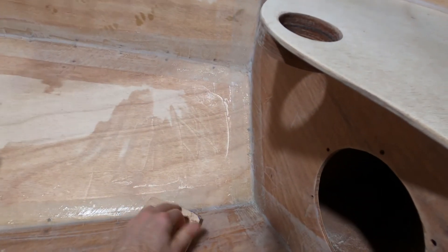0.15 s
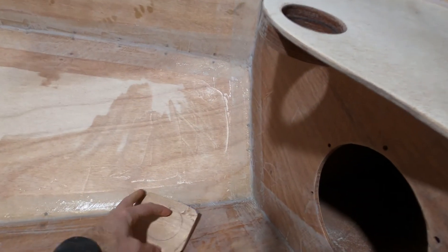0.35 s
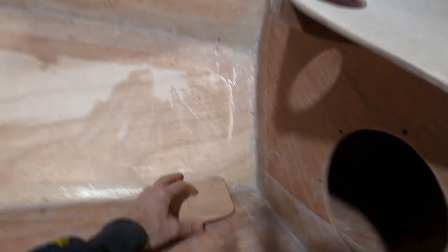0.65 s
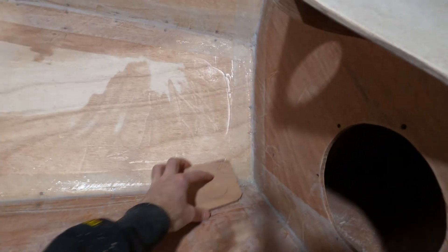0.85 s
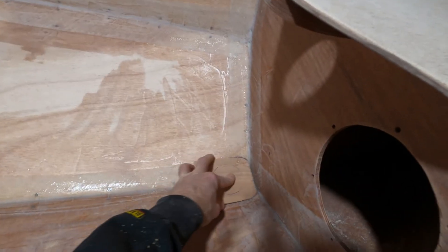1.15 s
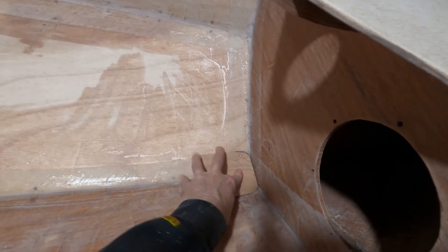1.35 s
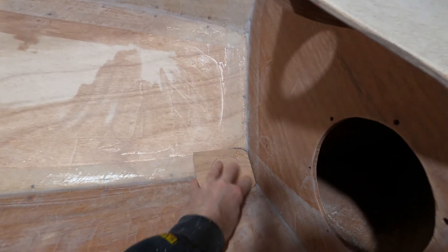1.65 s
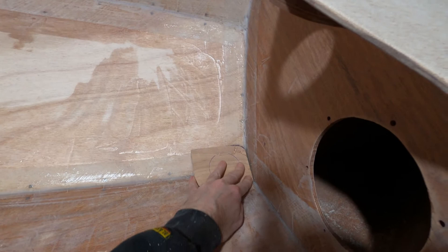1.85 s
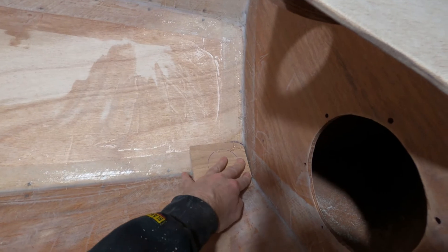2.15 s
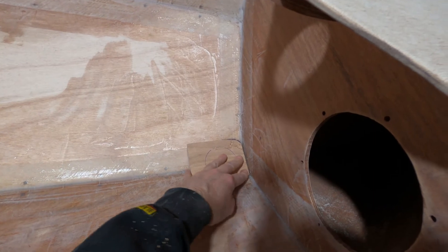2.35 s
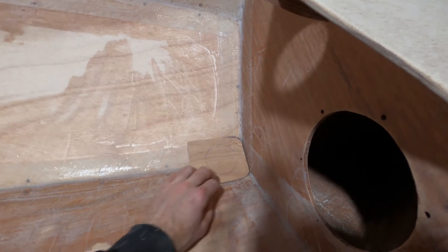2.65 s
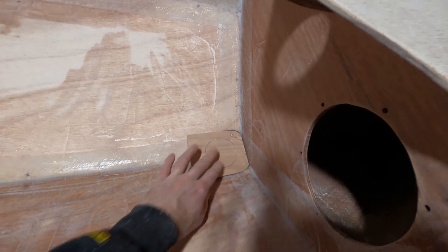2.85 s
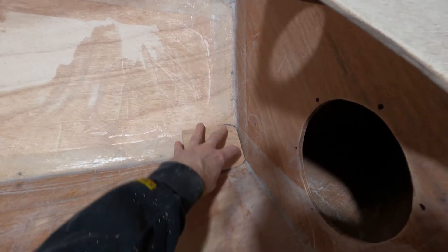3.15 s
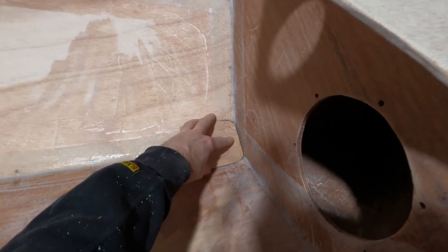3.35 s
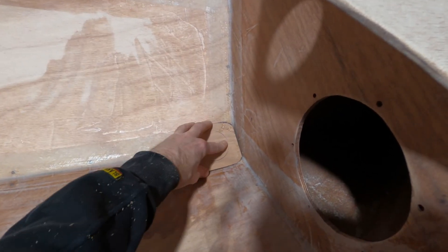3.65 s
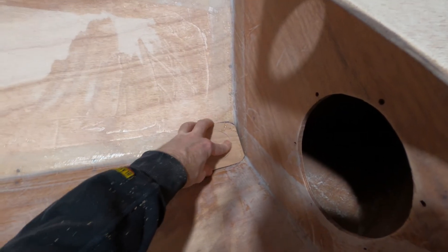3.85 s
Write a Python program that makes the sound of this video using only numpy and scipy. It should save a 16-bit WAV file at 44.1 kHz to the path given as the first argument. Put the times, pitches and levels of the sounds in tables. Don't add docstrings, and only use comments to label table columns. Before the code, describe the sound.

Plywood plate slaps down on a hollow wooden hull, then drags, knocks and rubs into a corner

```python
import sys
import numpy as np
from scipy import signal
from scipy.fft import rfft, irfft
from scipy.io import wavfile
from scipy.ndimage import uniform_filter1d, map_coordinates

SR = 44100
rng = np.random.default_rng(int(sys.argv[2]) if len(sys.argv) > 2 else 0)


def inscribe(sig):
    pcm = np.round(np.clip(np.atleast_2d(sig).T, -1, 1) * 32767)
    wavfile.write(sys.argv[1], SR, pcm.astype(np.int16))


def convert_level_to_amplitude(level_db):
    exponent = np.asarray(level_db, float) / 20
    return 10 ** exponent


N = 176400

# f/Hz, level/dB
BODY_COLOUR = [(120, -7), (220, 2.5), (400, 1), (650, -1.5), (1100, -8), (2500, -20)]
# f/Hz, width/Hz, level/dB
PANEL_MODES = [(285, 28, -2), (398.7, 25, 1.5), (519, 50, -2), (615.4, 14, 6)]


def unit(x):
    return x / np.sqrt(np.mean(x ** 2) + 1e-20)


def along(points, hz):
    f, v = np.transpose(points)
    return np.interp(np.log(hz + 0.15), np.log(f), v)


def wobble(rate):
    knots = rng.standard_normal(int(N * rate / SR) + 4)
    return map_coordinates(knots, [np.arange(N) * rate / SR])


def noise(spectrum, peaks=(), grit_db=0, patchy_db=0):
    grit = wobble(700) + wobble(60) + wobble(14)
    x = rng.standard_normal(N) * convert_level_to_amplitude(grit_db * grit)
    z = signal.stft(x, nperseg=512)[2]
    patches = uniform_filter1d(rng.standard_normal(z.shape), 5, 0)
    patches = unit(uniform_filter1d(patches, 9, 1))
    x = signal.istft(z * convert_level_to_amplitude(patchy_db * patches), nperseg=512)[1]
    f = np.fft.rfftfreq(len(x), 1 / SR)
    closed = [(spectrum[0][0] / 3, -120)] + list(spectrum) + [(spectrum[-1][0] * 3, -120)]
    resonance = 1 + sum(convert_level_to_amplitude(db) / (1 + (2 * (f - centre) / width) ** 2) for centre, width, db in peaks)
    gain = convert_level_to_amplitude(along(closed, f)) * resonance
    return unit(irfft(rfft(x) * gain, len(x))[:N])


def hump(s, length):
    t = np.arange(N) / SR - s
    rise_share = 0.92
    side = np.where(t < 0, rise_share, 2 - rise_share)
    return np.exp(-0.5 * (t / (length / 3 * side)) ** 2)


def swells(rows, waver, flutter_db):
    out = np.zeros(N)
    for s, db, hz, length in rows:
        strength = convert_level_to_amplitude(db - 2.5 + flutter_db * wobble(45)) * hump(s, length)
        cycles = hz * np.cumsum(1 + waver * wobble(40)) / SR
        out += strength * np.sin(2 * np.pi * cycles)
    return out


def knocks():
    # t/s, level/dB, contact softness f/Hz, decay stretch (0-2), bass cut f/Hz
    blow_rows = [
        (0.001, -26.5, 246, 0.96, 142.3),
        (0.0825, -15.5, 324, 0.087, 365),
        (0.1159, -11, 2380, 0.85, 166),
        (1.024, -16, 1764, 0.52, 276),
        (1.206, -19.5, 710, 0.5, 230),
        (2.701, -46, 4220, 0.4, 243),
    ]
    # f/Hz, level/dB per Hz
    wood_colour = [(71, -51), (120, -1.5), (629, -6.5), (835, -8), (1500, -13), (2640, -19.5), (3300, -17),
                   (4840, -17.5), (15000, -54)]
    # f/Hz, t60/s
    decay_times = [(100, 0.73), (300, 0.45), (1000, 0.5), (4000, 0.2), (7000, 0.24), (14000, .05)]
    out, t = np.zeros(N + SR), np.arange(SR // 2) / SR
    for s, db, soft_hz, stretch, cut_hz in blow_rows:
        rattle_s = 0.027 * convert_level_to_amplitude(db / 2)
        hz, ts, z = signal.stft(rng.standard_normal(len(t)), SR, nperseg=256)
        t60 = stretch * along(decay_times, hz)[:, None]
        fall = convert_level_to_amplitude(-60 * np.maximum(ts - rattle_s, 0) / t60)
        contact = 1 / (1 + (hz / soft_hz) ** 2) / (1 + (cut_hz / (hz + 1)) ** 4)
        colour = convert_level_to_amplitude(along(wood_colour, hz)) * contact
        wash = signal.istft(z * fall * colour[:, None], SR, nperseg=256)[1][:len(t)]
        wash = wash / np.sqrt(np.mean(colour ** 2))
        crack_band = signal.butter(2, [cut_hz, 1.46 * soft_hz], 'band', fs=SR)
        crack = unit(signal.lfilter(*crack_band, rng.standard_normal(len(t))))
        crack = convert_level_to_amplitude(3 - 60 * t / 0.0022) * crack
        bass_cut = signal.butter(2, 0.64 * cut_hz, 'high', fs=SR)
        blow = signal.lfilter(*bass_cut, wash * (1 - np.exp(-t / 0.00024)) + crack)
        out[round(s * SR):][:len(t)] += convert_level_to_amplitude(db) * blow
    return out[:N]


def struck():
    # t/s, level/dB, f/Hz, t60/s
    mode_rows = [(0.13, -2, 600, 0.067), (0.118, -5.5, 1090, 0.04), (.128, -15.5, 398, 0.3),
                 (0.18, -11.5, 270, 0.024), (.119, -12.5, 1400, .08), (.152, -9, 325, 0.099),
                 (1.027, -10, 685, 0.13), (1.024, -16, 1076, 0.16), (1.025, -23, 2306, 0.034),
                 (1.1, -24, 470, 0.16), (1.025, -20, 834, .3), (1.045, -21, 345, .3),
                 (1.2065, -11, 590, 0.11), (1.22, -26, 480, 0.29), (1.207, -27, 400, 0.3),
                 (1.207, -14.5, 990, 0.069)]
    out = np.zeros(N)
    for s, db, hz, t60 in mode_rows:
        t = np.arange(N) / SR - s
        decay = convert_level_to_amplitude(db - 60 * np.abs(t) / t60 + 1.6 * wobble(60)) * (t > 0)
        out += decay * np.sin(2 * np.pi * hz * t)
    return out


def slap():
    start_s, length_s, sag_s = 0.1165, 0.043, 0.018
    from_hz, to_hz = 1000, 291.8
    t = np.maximum(np.arange(N) / SR - start_s, 0)
    hz = to_hz + (from_hz - to_hz) * np.exp(-t / sag_s) + 60 * wobble(120.4)
    shape = np.clip(t / 0.002, 0, 1) * np.clip((length_s - t) / 0.003, 0, 1)
    return convert_level_to_amplitude(-11.5 + 3.65 * wobble(160)) * shape * np.sin(2 * np.pi * np.cumsum(hz) / SR)


def drag():
    # t/s, speed as hiss level/dB, load as body level/dB
    drag_path = [(0.329, -62.5, -29.5), (.37, -43.5, -34), (.55, -43.5, -37.5), (0.609, -35.5, -31.5),
                 (.72, -36.5, -33), (0.764, -43, -34.5), (.8, -42.5, -34), (1, -40.5, -38),
                 (1.07, -33.5, -61), (1.14, -44.5, -39.5), (1.2, -40, -47), (1.29, -63, -46)]
    # f/Hz, level/dB
    hiss_colour = [(500, 5), (1500, 0.5), (3000, -6.5), (4100, -5.5), (5600, -7), (6500, -13.5),
                   (10000, -16.5), (15500, -29.5)]
    s, hiss_db, body_db = np.transpose(drag_path)
    t = np.arange(N) / SR
    speed = convert_level_to_amplitude(np.interp(t, s, hiss_db, left=-120, right=-120))
    load = convert_level_to_amplitude(np.interp(t, s, body_db, left=-120, right=-120))
    hiss = speed * noise(hiss_colour, grit_db=1.03, patchy_db=2.0)
    return hiss + load * noise(BODY_COLOUR, PANEL_MODES, grit_db=0.5, patchy_db=3.2)


def rubs():
    # t/s, length/s, scrape, body and fizz level/dB
    rub_rows = [
        (.07, 0.062, -49, -57.5, -58.5),
                (1.349, 0.053, -45.5, -40, -51), (1.473, 0.12, -57.5, -55.5, -65.5),
                    (1.553, 0.047, -54.5, -51, -57), (1.624, 0.2, -57.5, -53, -62.5),
                    (1.698, 0.067, -44.5, -53, -50.5), (1.767, 0.16, -51, -58, -61.5),
                    (1.875, 0.09, -47.5, -43, -63), (2.046, 0.075, -60.5, -61, -73),
                    (2.124, 0.028, -68, -65, -79), (2.245, 0.097, -66.5, -65, -74),
                    (2.418, 0.054, -57, -60.5, -65.5),
                (2.727, 0.056, -57.5, -49, -63.5), (2.859, 0.1343, -53, -53.5, -70),
                   (3.011, 0.21, -53, -45, -62.5), (3.085, 0.37, -71, -58, -82),
                   (3.217, 0.071, -55, -48.5, -55), (3.3, 0.11, -49.5, -55, -54.5),
                   (3.412, 0.043, -55.5, -48, -59.5), (3.487, 0.12, -48.5, -50, -60),
                   (3.529, 0.15, -53.5, -47, -63), (3.68, 0.094, -49, -45, -64),
                   (3.745, 0.16, -57.5, -56.5, -69.5), (3.885, 0.087, -53, -55, -64.5),
                   (3.93, 0.054, -40, -43, -56), (3.969, 0.057, -42, -33.5, -55)]
    # f/Hz, width/Hz, level/dB
    gap_modes = [(1177, 610, 8), (3300, 260, -1), (5624, 220, -10)]
    # f/Hz, level/dB
    scrape_colour = [(400, -15), (900, -4), (2000, -5.5), (5500, -4), (6800, -11), (12000, -45.5)]
    fizz_colour = [(6500, -15), (7800, 0), (9200, 1.5), (11000, -4.5), (13000, -7.5), (15500, -13)]
    rows = np.array(rub_rows)
    shape = np.array([hump(s, 0.84 * length) + convert_level_to_amplitude(-14) * hump(s, 3 * length) for s, length in rows[:, :2]])
    scrape, body, fizz = np.sqrt(convert_level_to_amplitude(2 * rows[:, 2:].T) @ shape ** 2)
    return (convert_level_to_amplitude(0.5) * scrape * noise(scrape_colour, gap_modes, grit_db=1.8, patchy_db=1.5)
            + body * noise(BODY_COLOUR, PANEL_MODES, grit_db=1.4, patchy_db=2.5)
            + fizz * noise(fizz_colour, grit_db=1.5, patchy_db=-1.0))


def skates():
    # t/s, level/dB, f/Hz, length/s, width/Hz
    skate_rows = [(.425, -52, 4050, .05, 400), (.6, -46, 4200, .14, 400), (0.844, -49, 3310, 0.1, 180),
                  (.95, -52, 3300, .1, 300), (1.348, -52, 4700, .05, 500), (1.546, -56, 1201, 0.71, 398.6),
                  (1.47, -60, 3450, .12, 250), (1.55, -56, 3200, .04, 500), (1.66, -57, 3350, .2, 300),
                  (1.66, -59, 5600, .2, 350), (1.78, -58, 3300, .12, 600), (2.055, -62, 3400, .09, 300),
                  (2.278, -65, 1160, 0.3, 399.7), (2.27, -66, 3400, 0.2, 300), (2.42, -60, 3350, .05, 350),
                  (2.74, -57, 1600, .08, 250), (2.88, -58, 3100, .14, 900), (2.87, -52, 900, .12, 700),
                  (3.154, -54, 1150, 0.78, 450.4), (3.1, -60, 3400, .15, 300), (3.22, -55, 3450, 0.08, 349),
                  (3.31, -54, 3500, .1, 400), (3.3, -56, 5500, .07, 600), (3.44, -59, 4500, .1, 350),
                  (3.76, -58, 1500, .1, 500), (3.927, -46, 1140, .045, 120)]
    t = np.arange(N) / SR
    out = np.zeros(N)
    for s, db, hz, length, width_hz in skate_rows:
        strength = convert_level_to_amplitude(db + 3 * wobble(30)) * hump(s, length)
        band = wobble(width_hz) * np.sin(2 * np.pi * hz * t)
        band += wobble(width_hz) * np.cos(2 * np.pi * hz * t)
        out += strength * band
    return out


def ticks():
    # t/s, peak level/dB, centre f/Hz
    click_rows = [(.1162, -5, 1300), (.171, -25, 2400), (.202, -21, 2900), (.414, -33.5, 1900),
                  (.46, -40, 3100), (.566, -36, 1650), (.677, -36.5, 1790), (.769, -32.5, 1500),
                  (1.0251, -22, 3000), (1.031, -26, 2300), (1.159, -38, 3400), (1.339, -41.5, 1307),
                  (2.381, -46, 900), (2.702, -45.5, 2500), (2.829, -44.5, 1500), (2.915, -42, 1500),
                  (3.005, -38.5, 1700), (3.287, -48.5, 1180), (3.488, -44, 2200), (3.553, -41, 1880),
                  (3.893, -47, 1120)]
    out, t = np.zeros(N + SR), np.arange(SR // 20) / SR
    for s, db, hz in click_rows:
        band = signal.butter(2, [hz / 1.5, hz * 1.5], 'band', fs=SR)
        decay = convert_level_to_amplitude(-60 * t * hz / 20)
        click = signal.lfilter(*band, decay * rng.standard_normal(len(t)))
        out[round(s * SR):][:len(t)] += convert_level_to_amplitude(db + 2.5) * click / np.abs(click).max()
    return out[:N]


def bumps():
    # t/s, level/dB, f/Hz, length/s
    bump_rows = [(.083, -34.5, 3300, 0.016), (.325, -23, 550, 0.01), (.445, -25.5, 400, 0.083),
                 (.6, -22.5, 285, 0.033), (.8, -32.5, 595, 0.077), (1.075, -19.5, 349, 0.043),
                 (1.21, -33, 3310, 0.0042), (3.53, -44, 374, 0.087), (3.69, -40, 430, 0.072),
                 (3.68, -45, 600, 0.047), (3.96, -39, 300, 0.064), (3.95, -39, 560, .07)]
    return swells(bump_rows, waver=0.0142, flutter_db=2.5)


def booms():
    # t/s, level/dB, f/Hz, length/s
    boom_rows = [
        (.21, -29, 97, 0.23),
        (1.02, -34, 99.1, 0.23),
        (1.9, -40, 95, 0.076),
        (2.76, -47.5, 98, 0.11),
        (2.972, -21.5, 98.3, 0.054),
        (3.06, -19.5, 93.7, 0.14),
        (3.27, -40.5, 99, 0.48),
        (3.99, -29.5, 96.5, 0.077),
    ]
    return swells(boom_rows, waver=0.021, flutter_db=1.0)


def groan():
    # f/Hz, level/dB
    groan_colour = [(110, 5.5), (150, -10), (250, -4), (320, -48)]
    t = np.arange(N) / SR - 2.925
    beat = 1 + 0.34 * np.sin(2 * np.pi * 95 * t)
    decay = convert_level_to_amplitude(-31 - 60 * np.abs(t) / 0.8)
    return decay * np.clip(t / 0.011, 0, 1) * beat * noise(groan_colour)


def room(x):
    t = np.arange(SR // 2) / SR
    tail = uniform_filter1d(rng.standard_normal(len(t)), size=4) * convert_level_to_amplitude(-60 * t / 0.45)
    return signal.fftconvolve(np.pad(x, (300, 0)), tail / np.linalg.norm(tail))[:N]


def sway():
    # t/s, level/dB
    shake_path = [(0, -6), (.7, 5), (1.1, -4), (1.5, 4), (2.1, 0), (2.7, -3.5), (3.298, 1.5), (4, 4.5)]
    # f/Hz, level/dB
    sway_colour = [(1.5, -26.5), (4, 6.5), (8, -2.5), (16, -8.5), (25, -14), (40, -53), (60, -54)]
    s, shake_db = np.transpose(shake_path)
    shake = convert_level_to_amplitude(np.interp(np.arange(N) / SR, s, shake_db - 0.5))
    return convert_level_to_amplitude(-24) * shake * noise(sway_colour)


def room_floor():
    # f/Hz, level/dB
    floor_colour = [(50, 1), (100, -14), (150, -15), (500, -18), (1100, -23.5), (2000, -27.5), (15500, -40)]
    # f/Hz, width/Hz, level/dB
    cavity_mode = [(97, 27, 13.5)]
    return convert_level_to_amplitude(-54.5) * noise(floor_colour, cavity_mode)


def scene():
    blows = knocks() + struck() + slap()
    friction = drag() + rubs() + skates() + ticks()
    wood = blows + friction + bumps() + booms() + groan()
    return (wood + convert_level_to_amplitude(-16.5) * room(wood) + sway() + room_floor())[None]


def low_pass(x):
    return signal.sosfilt(signal.butter(12, 16290, fs=SR, output="sos"), x)


def record(dry):
    x = dry / (1 + np.abs(dry) ** 6) ** (1 / 6)
    x = irfft(rfft(x) * (np.fft.rfftfreq(N, 1 / SR) < 15800), N)
    return low_pass(x)


dry = scene()
out = record(dry)
inscribe(out)
```